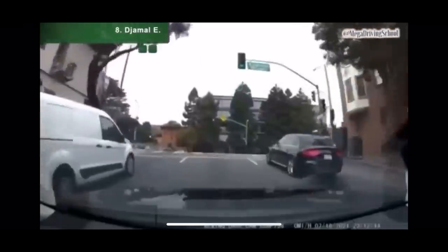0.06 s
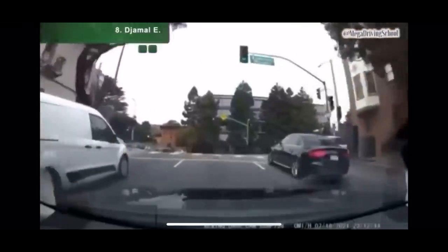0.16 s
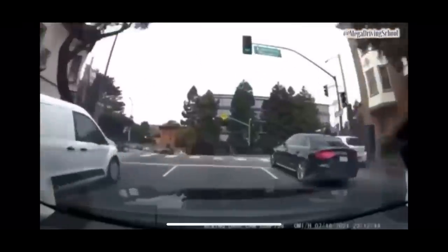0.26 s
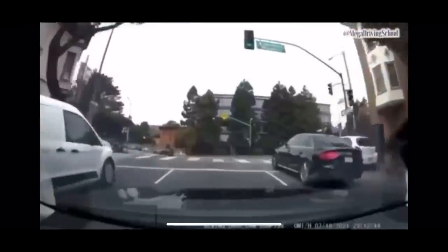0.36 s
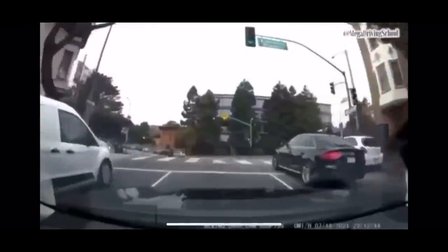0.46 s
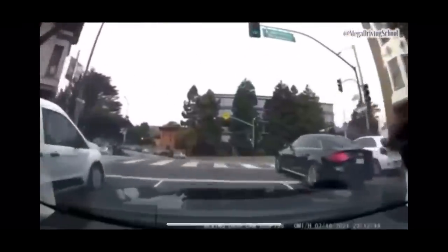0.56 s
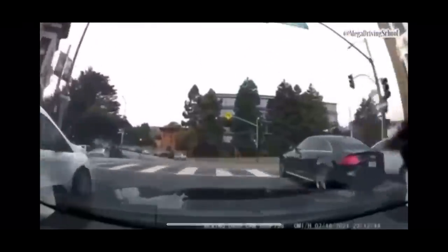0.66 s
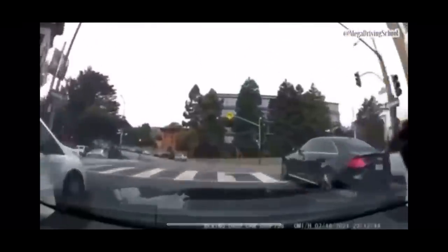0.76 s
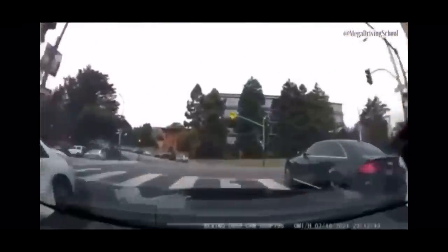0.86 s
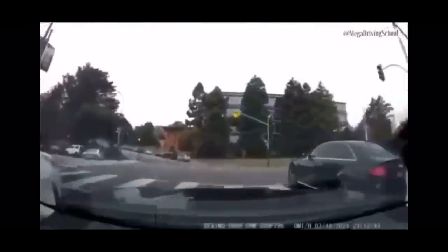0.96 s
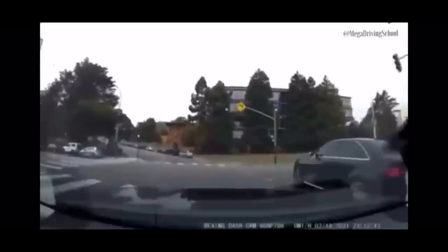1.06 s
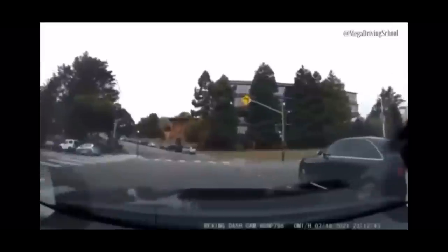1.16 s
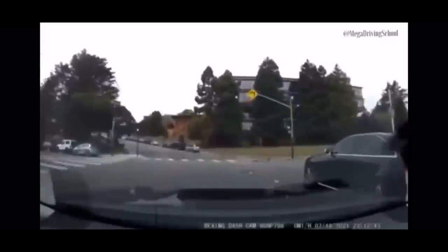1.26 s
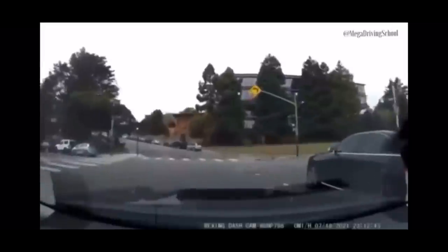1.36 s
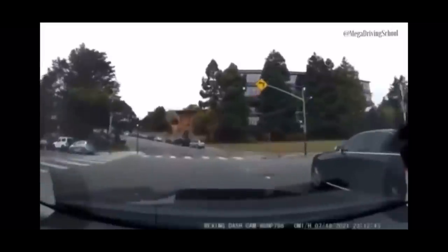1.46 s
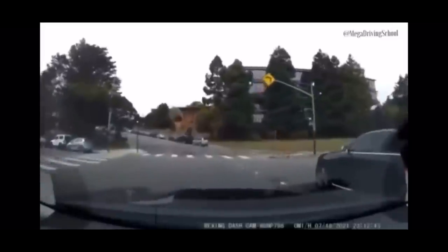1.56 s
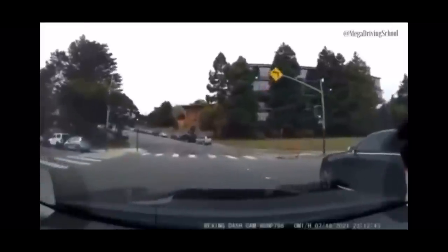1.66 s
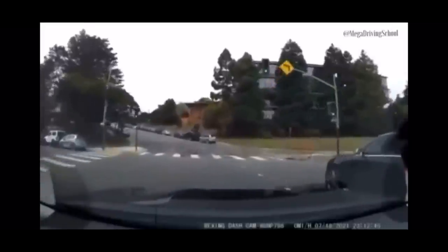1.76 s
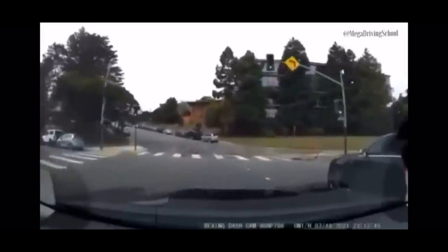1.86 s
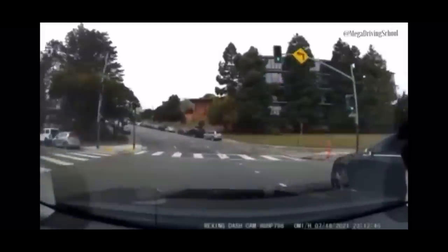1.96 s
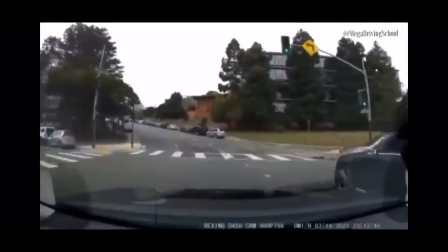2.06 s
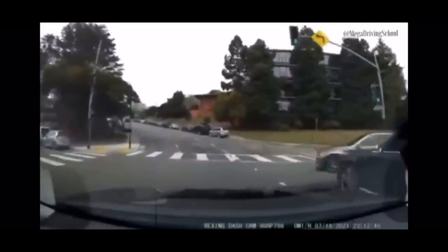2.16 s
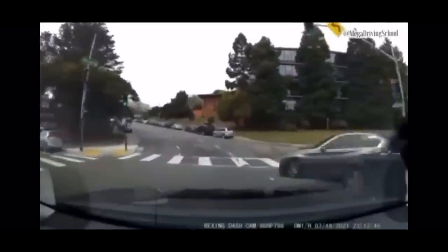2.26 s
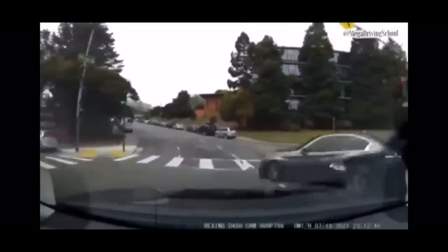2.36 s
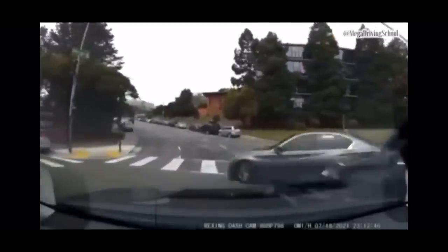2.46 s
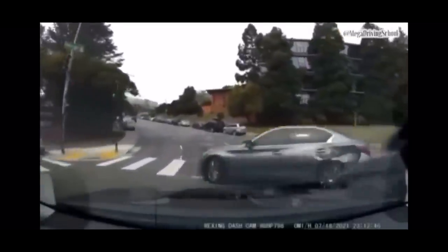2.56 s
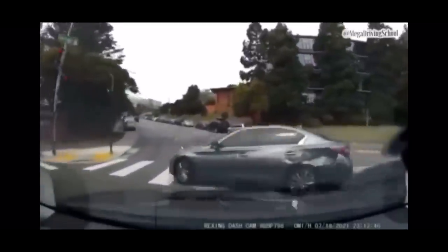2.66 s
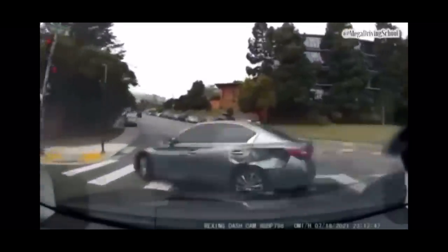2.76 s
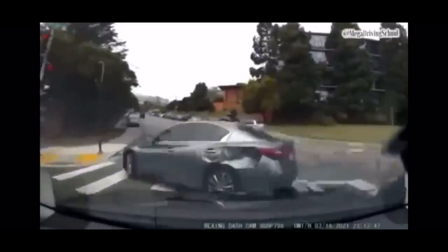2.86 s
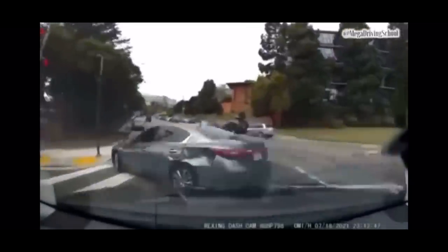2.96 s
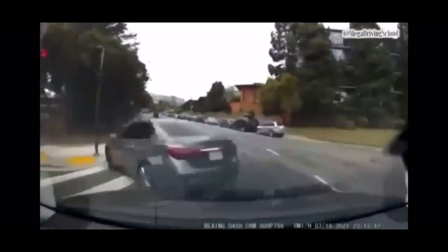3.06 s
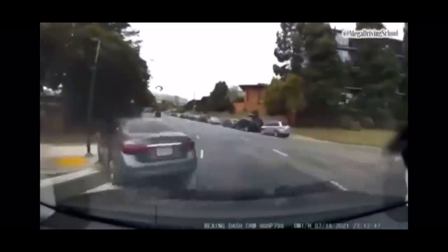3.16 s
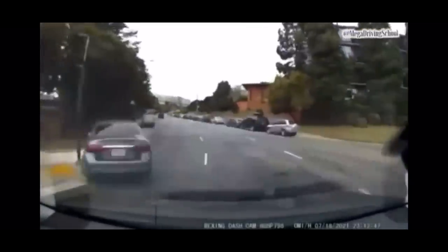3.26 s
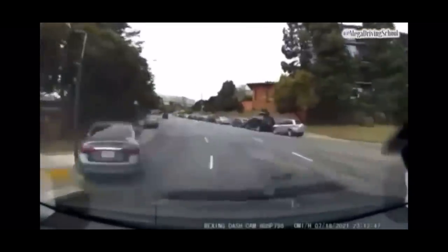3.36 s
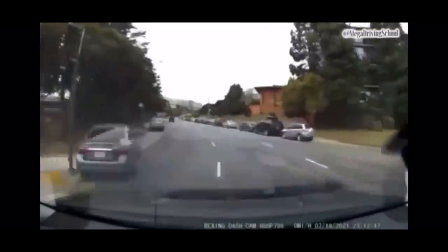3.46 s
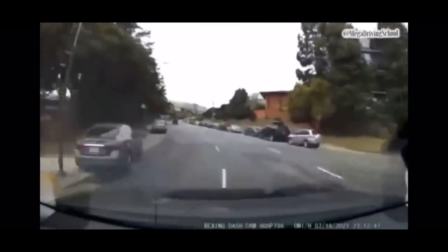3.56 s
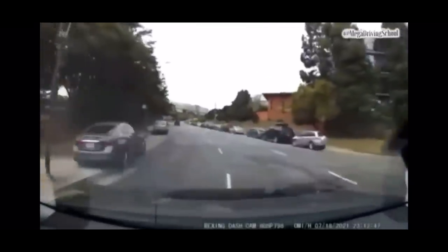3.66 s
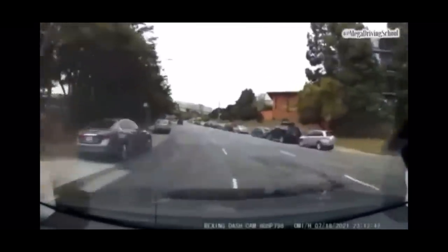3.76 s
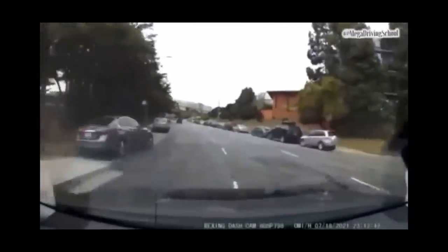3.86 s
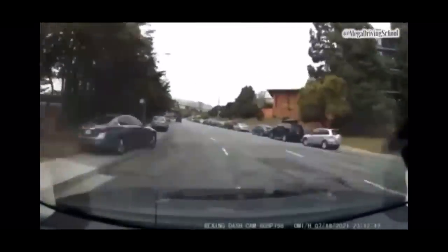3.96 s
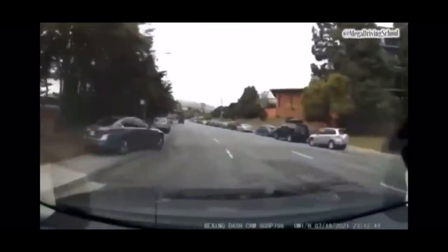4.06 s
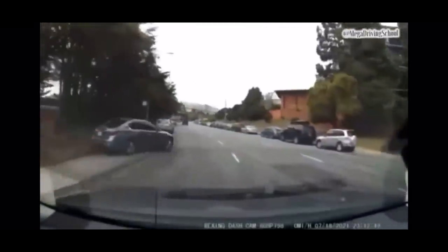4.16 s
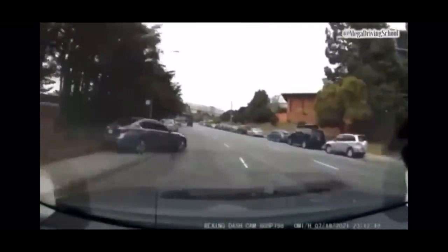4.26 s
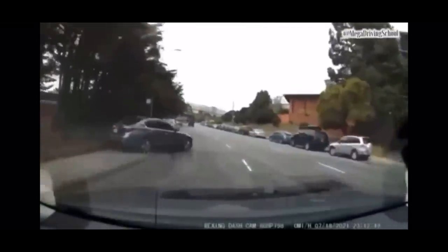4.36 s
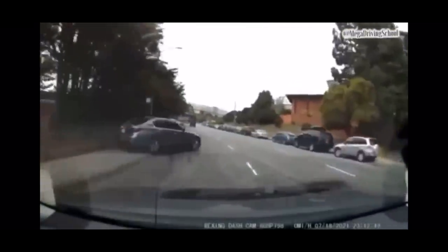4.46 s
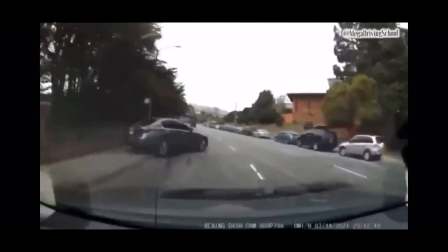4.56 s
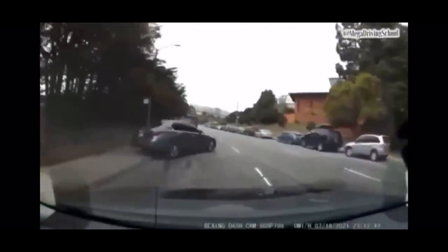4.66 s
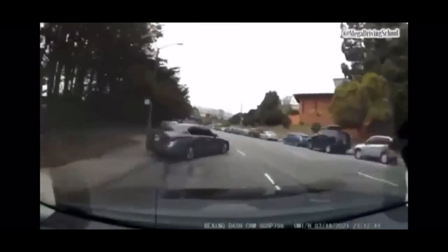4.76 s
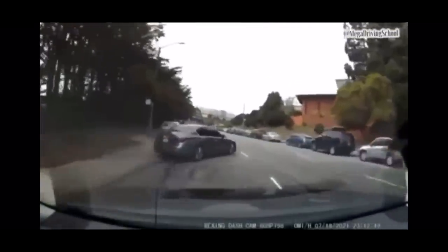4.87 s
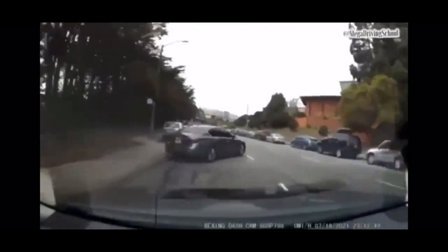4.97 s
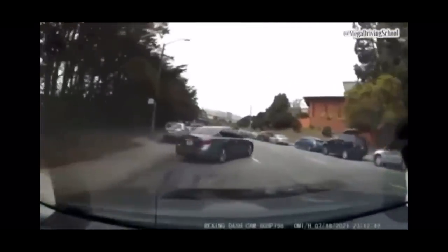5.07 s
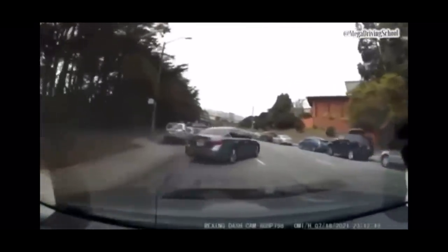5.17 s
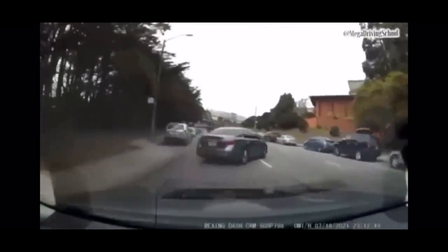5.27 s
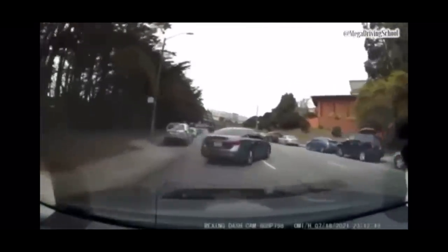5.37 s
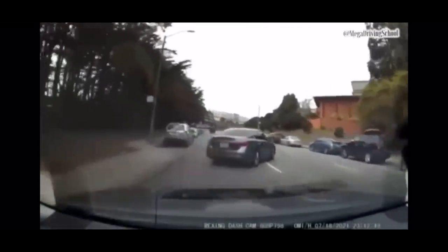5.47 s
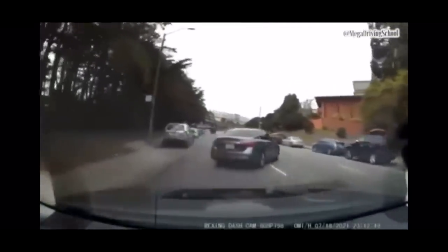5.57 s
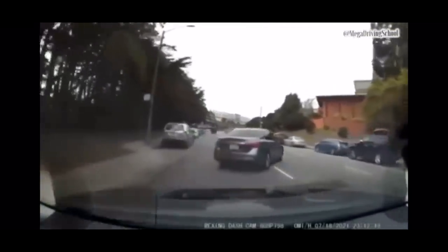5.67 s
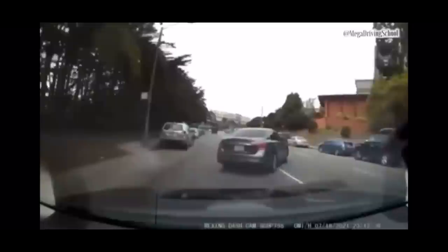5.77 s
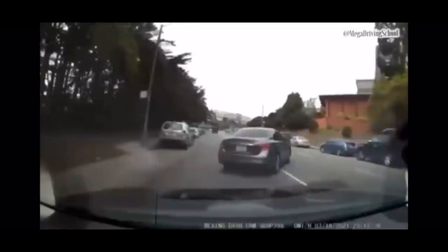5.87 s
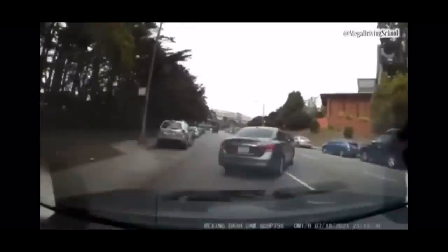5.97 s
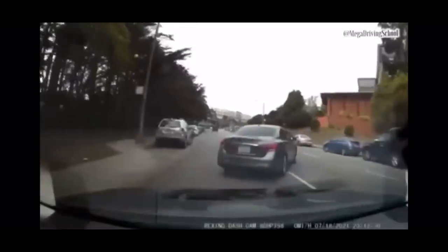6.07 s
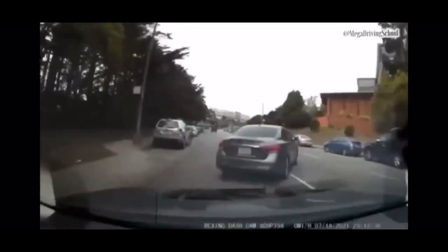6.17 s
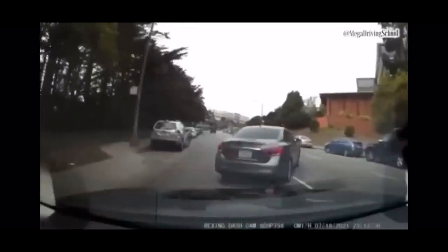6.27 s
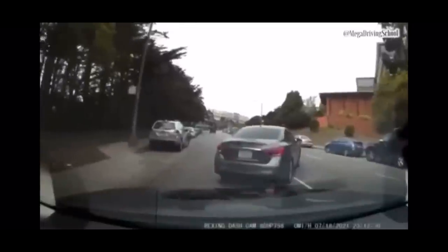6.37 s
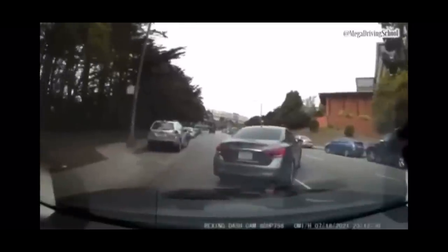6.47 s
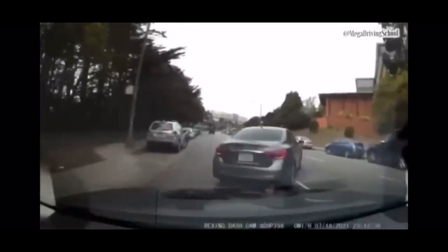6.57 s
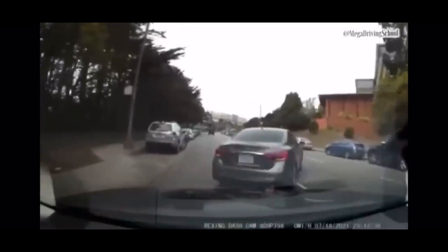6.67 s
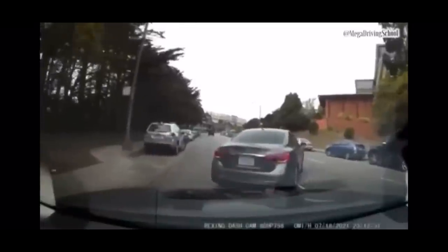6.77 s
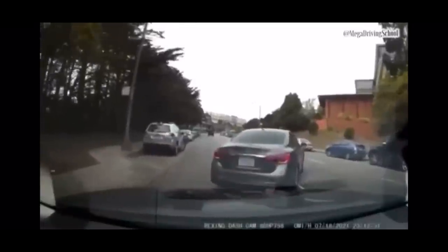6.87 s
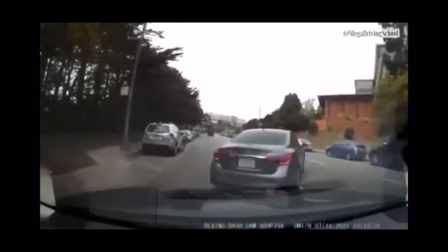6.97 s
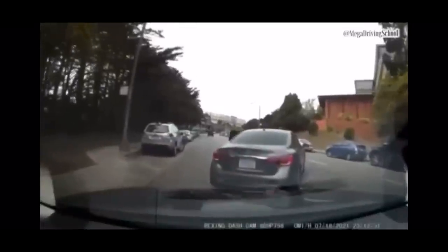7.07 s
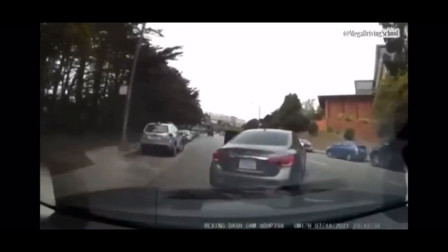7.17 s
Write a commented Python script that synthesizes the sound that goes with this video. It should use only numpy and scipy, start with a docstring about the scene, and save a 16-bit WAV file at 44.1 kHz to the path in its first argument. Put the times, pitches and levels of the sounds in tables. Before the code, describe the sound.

From inside a following car, soft low rumble, floor roar and muffled traffic wash open the scene. From about 1 second a faint hoarse tyre tone creeps in, and from 1.6 it grows into a wavering mid-pitched howl, joined around 2 to 2.6 by higher, rougher squeals with tearing edges. Quick chirps follow at 2.7 and 2.8, while heavy low bumps thump through the cabin until about 3.3. A second, patchier squeal runs from 3.2 to 3.8 with short bites, then a bright two-toned screech beats from 4 to 4.5 and echoes along the street. Small scrapes accompany the skids. Loose things tick and rattle at 4.6 to 5.25. After a quieter roll, braking brings a sharp hard knock at 5.95, low judder and a hollow clunk near 6.2, then a short dull brake groan at 6.3, fading almost to silence by 7.

```python
"""Skidding saloon, heard from a following car

A saloon skids through a junction on squealing tyres, slides on and squeals again: stick-slip tones,
chirps, squeaks and tearing noise, echoed by the street. The following car rumbles over the crossing
(shaped noise, ringing body modes) and brakes; loose things in its cabin tick as struck modes and
rattles, one knocks sharply as it slows, and the brakes groan as it stops."""
import sys
import numpy as np
from scipy import signal
from scipy.fft import rfft, irfft, next_fast_len
from scipy.io import wavfile
from scipy.ndimage import uniform_filter1d, minimum_filter1d

SR = 44100
rng = np.random.default_rng(int(sys.argv[2]) if len(sys.argv) > 2 else 0)


def generate_wav(signal):
    """Clip the signal to [-1, 1] and save it as 16-bit WAV at the path in sys.argv[1]."""
    frames = np.transpose(np.atleast_2d(signal))
    scaled = np.clip(frames, -1, 1) * 32767
    pcm = np.round(scaled).astype(np.int16)
    wavfile.write(sys.argv[1], SR, pcm)


N = 318611
TIME = np.arange(N) / SR


def from_db(db):
    """Decibels to amplitude gain."""
    return 10 ** (np.asarray(db) / 20)


def rms_one(x):
    """Scale to unit rms."""
    return x / np.sqrt(np.mean(np.abs(x) ** 2) + 1e-20)


def in_time(rows):
    """Interpolate each column of a curve at every sample."""
    time_s, *columns = np.transpose(rows)
    return [np.interp(TIME, time_s, column) for column in columns]


def low_pass(x, hz, order=2):
    """Butterworth low-pass."""
    return signal.sosfilt(signal.butter(order, min(hz, SR / 3), fs=SR, output="sos"), x)


def band(x, low_hz, high_hz, order=2):
    """Butterworth band-pass."""
    edges_hz = [low_hz, min(high_hz, SR / 2.3)]
    return signal.sosfilt(signal.butter(order, edges_hz, "band", fs=SR, output="sos"), x)


def drift(rate_hz, order=2, size=N):
    """Smooth random wander of unit rms, drawn at every 16th sample."""
    step, run_in = 16, 3000
    white = rng.standard_normal(N // step + run_in + 2)
    slow = rms_one(low_pass(white, rate_hz * step, order)[run_in:])
    return np.interp(np.arange(size) / step, np.arange(len(slow)), slow)


def noise(spectrum):
    """Gaussian noise of a given spectral density, unit rms, falling away beyond the end points."""
    hz, db = np.transpose(spectrum)
    size = next_fast_len(N, real=True)
    f = np.maximum(np.fft.rfftfreq(size, 1 / SR), 1)
    skirts = np.minimum(1, np.minimum(f / hz[0], hz[-1] / f)) ** 2
    colour = from_db(np.interp(np.log(f), np.log(hz), db))
    white = rfft(rng.standard_normal(size))
    return rms_one(irfft(white * skirts * colour, size)[:N])


def swell(start_s, end_s, rise_s, fall_s):
    """Gain that rises, holds from start to end and dies away; rise and fall are times per 20 dB."""
    before = np.maximum(start_s - TIME, 0) / rise_s
    after = np.maximum(TIME - end_s, 0) / fall_s
    return np.exp(-np.log(10) * (before + after).clip(0, 10))


def strike(hits, modes):
    """Each hit excites every damped resonance with a random strength of its own."""
    out = np.zeros(N)
    hit_s, level_db = np.transpose(hits)[:2]
    for hz, mode_db, t60_s in modes:
        clicks = np.full(N, 1e-18)
        chance_db = rng.normal(0, 1.5, len(hit_s))
        clicks[(hit_s * SR).astype(int)] = from_db(level_db + mode_db + chance_db)
        radius = np.exp(-np.log(1000) / (t60_s * SR))
        angle = 2 * np.pi * hz / SR
        out += signal.lfilter([0, np.sin(angle)], [1, -2 * radius * np.cos(angle), radius ** 2], clicks)
    return out


# Steady rolling, dying away as the car stops: t/s, body rumble/dB, road roar/dB, tyre hiss/dB
ROLLING_CURVE = [(0, -44, -47, -67), (.75, -47, -44, -60), (1.4, -38, -42.5, -57.5),
                 (2.1, -46.5, -44, -53.5), (4.35, -46, -49.5, -48), (5.8, -46, -55, -61.5),
                 (6.65, -56.5, -56, -60), (7.22, -61, -57, -67)]
# Shaking from rough ground or hard braking: start t/s, end t/s, rumble/dB, roar/dB
SHAKING_SPELLS = [(2.383, 4.016, -37.5, -37), (2.792, 2.948, -21, -25), (2.996, 3.087, -25, -59),
                  (3.266, 3.373, -27.5, -50), (5.926, 6, -27.5, -33.5), (6.07, 6.3, -40, -45.5),
                  (6.375, 6.45, -35.5, -48)]
# Single bumps under the wheels: t/s, rumble/dB, roar/dB
WHEEL_BUMPS = [(1.17, -33.5, -48), (2.357, -45, -23), (2.531, -46, -28.5), (2.679, -26.5, -27),
               (2.92, -24, -23.5), (3.255, -21.5, -25.5), (3.539, -30.5, -35.5), (3.99, -35.5, -32.5),
               (4.189, -41, -40.5), (4.503, -34, -31), (4.551, -30.5, -36), (4.65, -38, -44.5),
               (5.932, -39, -36.5), (6.11, -37, -56), (6.425, -31.5, -46.5)]
SHAKE_RISE_S, SHAKE_FALL_S = 0.11, 0.14  # per 20 dB
BUMP_RISE_S, BUMP_FALL_S = 0.037, 0.12  # per 20 dB


def shaking():
    """Rumble and roar gains: rolling, shaking spells and bumps add in power."""
    power = from_db(in_time(ROLLING_CURVE)[:2]) ** 2
    for start_s, end_s, *db in SHAKING_SPELLS:
        power += np.outer(from_db(db), swell(start_s, end_s, SHAKE_RISE_S, SHAKE_FALL_S)) ** 2
    for time_s, *db in WHEEL_BUMPS:
        power += np.outer(from_db(db), swell(time_s, time_s, BUMP_RISE_S, BUMP_FALL_S)) ** 2
    return np.sqrt(power)


# Relative noise densities of body rumble, heave on the springs and floor roar: f/Hz, density/dB
RUMBLE_SPECTRUM = [(38, -10), (48, 5), (62, -5), (85, -6.5), (125, -5), (165, -18.5)]
HEAVE_SPECTRUM = [(14, -5.5), (20, 1), (27, -2), (36, -15), (44, -22)]
ROAR_SPECTRUM = [(110, -18), (140, -9.5), (175, 1.5), (240, -1), (330, -7), (450, -6.5), (650, -7.5),
                 (850, -16), (1200, -14), (1600, -17.5), (2000, -22.5)]
HEAVE_REL_RUMBLE_DB, HEAVE_SMOOTHING_S = 2.5, 0.24


def ride():
    """The road shakes the car body, rocks it on its springs and roars through the floor."""
    rumble_gain, roar_gain = shaking()
    rumble = rumble_gain * noise(RUMBLE_SPECTRUM)
    heave_gain = uniform_filter1d(rumble_gain, size=int(HEAVE_SMOOTHING_S * SR))
    heave = from_db(HEAVE_REL_RUMBLE_DB) * heave_gain * noise(HEAVE_SPECTRUM)
    roar = roar_gain * from_db(1.0 * drift(35)) * noise(ROAR_SPECTRUM)
    return rumble + heave + roar


# Drag of sliding rubber on asphalt: t/s, level/dB
DRAG_CURVE = [(0, -61), (.85, -51), (1.55, -49), (2.3, -39), (2.72, -43), (2.98, -47), (3.14, -79),
              (3.28, -47), (3.6, -46.5), (3.8, -40), (4.15, -48), (4.35, -53), (4.75, -54.5), (5.3, -66),
              (6, -64), (6.7, -83)]
# Patches of loose grit under the tyres: start t/s, end t/s, level/dB
LOOSE_GRIT = [(2.43, 2.68, -43), (3.697, 3.948, -43), (4.316, 4.857, -63.5), (5.848, 6.095, -60.5)]
# Relative noise densities of the three voices: f/Hz, density/dB
SCRUB_SPECTRUM = [(600, -19), (820, 5), (970, 3.5), (1100, -3), (1250, -2), (1600, -4), (1850, -17.5),
                  (2400, -28.5)]
RASP_SPECTRUM = [(1400, -28), (1900, 2), (2400, 1.5), (2900, 3.5), (3600, -5.5), (4600, -16), (6500, -38.5)]
GRIT_SPECTRUM = [(3000, -2), (4200, 2.5), (5600, 1.5), (6700, -4.5), (8000, -6), (9000, -14), (11000, -16)]
SCRUB_REL_DRAG_DB, RASP_REL_DRAG_DB, GRIT_REL_DRAG_DB = 10, -1.5, -20
HISS_IN_GRIT_DB, PATCH_IN_RASP_DB = -5, 1
PATCH_RISE_S, PATCH_FALL_S = 0.19, 0.18  # per 20 dB


def scrubbing():
    """Rubber drags and rolls over coarse asphalt; rasp and grit come in tiny uneven bursts."""
    drag = from_db(in_time(DRAG_CURVE)[0])
    hiss = from_db(in_time(ROLLING_CURVE)[2])
    patches = sum(from_db(db) * swell(start_s, end_s, PATCH_RISE_S, PATCH_FALL_S)
                  for start_s, end_s, db in LOOSE_GRIT)
    grains = from_db(1.7 * drift(160) + 1.0 * drift(11))
    scrub = from_db(SCRUB_REL_DRAG_DB) * drag * noise(SCRUB_SPECTRUM)
    # norm: contributions add in power
    rasp_parts = [from_db(RASP_REL_DRAG_DB) * drag, hiss, from_db(PATCH_IN_RASP_DB) * patches]
    rasp = np.linalg.norm(rasp_parts, axis=0) * noise(RASP_SPECTRUM)
    grit_parts = [from_db(GRIT_REL_DRAG_DB) * drag, from_db(HISS_IN_GRIT_DB) * hiss, patches]
    grit = np.linalg.norm(grit_parts, axis=0) * noise(GRIT_SPECTRUM)
    return scrub + grains * (rasp + grit)


# Wash of other traffic: t/s, level/dB
TRAFFIC_CURVE = [(0, -55.5), (5.3, -54), (6.2, -60), (6.7, -58), (7.22, -62.5)]
# Its relative noise density: f/Hz, density/dB
WASH_SPECTRUM = [(350, -1), (600, -5.5), (900, 1), (1300, -5), (1600, 0), (2100, -22)]


def traffic():
    """Other cars roll by in uneven surges, dulled by the closed windows."""
    surge_db = 1.8 * drift(5.2)
    return from_db(in_time(TRAFFIC_CURVE)[0] + surge_db) * noise(WASH_SPECTRUM)


SLIP_START_DB = -50  # envelope below which the tyre is silent


def tyre(hz, envelope, rough, spread_hz, waver_hz, flutter_db, second_db, third_db):
    """Tread blocks stick and slip: in step one wavering tone, out of step a hoarse band around it."""
    sliding = envelope > from_db(SLIP_START_DB)
    size, rough, out = sliding.sum(), np.clip(rough, 0, 1), np.zeros(N)
    wavering_hz = hz[sliding] + waver_hz * drift(35.25, size=size)
    turn = np.exp(2j * np.pi * np.cumsum(wavering_hz) / SR)
    scatter_re = drift(spread_hz, order=4, size=size)
    scatter_im = drift(spread_hz, order=4, size=size)
    scatter = (scatter_re + 1j * scatter_im) / np.sqrt(2)
    slip = turn * (np.sqrt(1 - rough ** 2) + rough * scatter)
    # friction holds the mean swing steady while the blocks beat against each other
    slip /= np.sqrt(uniform_filter1d(np.abs(slip) ** 2, size=1300) + 1e-9)
    # sudden release of each slip adds ragged overtones
    ragged = turn * np.exp(1j * 0.85 * drift(94, size=size))
    wave = np.real(slip * (1 + from_db(second_db) * ragged + from_db(third_db) * ragged ** 2))
    out[sliding] = np.sqrt(2) * wave * from_db(flutter_db * drift(36, size=size))
    return envelope * out


# Howls: start t/s, end t/s, rise/(s per 20 dB), fall/(s per 20 dB), start f/Hz, glide/(Hz/s), level/dB,
# roughness (clipped to 1), spread/Hz, second harmonic/dB
HOARSE_SKIDS = [(.95, 1.187, 1.1, 0.48, 982, 24.5, -48, 0.5, 110, -11),
                (2.06, 2.194, .35, 0.17, 900.7, 66, -29.5, 0.74, 73, -25.5),
                (1.76, 2.265, 0.19, 0.13, 1563, -32, -34.5, 0.67, 83, -19.5),
                (1.94, 2.067, 0.08, 0.13, 1340, 597, -29.5, 0.69, 121, -19.5),
                (2.121, 2.573, 0.21, 0.28, 1464, -59, -35, 1.1, 129.4, -18.5),
                (2.328, 2.493, 0.038, 0.12, 1381, -190, -25, 0.33, 80, -19),
                (2.505, 2.559, .03, 0.13, 1421, 900.5, -31.5, .45, 80, -19.5),
                (2.876, 3.017, 0.1, 0.05, 1017, 6, -40.5, 0.87, 147, -20.5),
                (3.45, 3.758, 0.28, 0.12, 889, 169, -37, 0.84, 75, -9.5),
                (3.751, 4.097, 0.12, 0.28, 860.4, 110.5, -32.5, 1.04, 60.5, -10),
                (3.27, 3.697, 0.069, 0.16, 1537, 1.5, -48, 0.65, 112, -10.5),
                (3.781, 3.984, 0.13, 0.13, 1578, 93, -38, 0.5, 90, -24),
                (3.89, 3.962, 0.049, 0.057, 1194, -600, -31.5, 0.6, 90, -16)]


def skids():
    """Hoarse sliding tyres: each swells, glides slowly while it holds, and fades."""
    out = np.zeros(N)
    for start_s, end_s, rise_s, fall_s, hz, glide, db, rough, spread_hz, overtone_db in HOARSE_SKIDS:
        pitch_hz = hz + glide * (np.clip(TIME, start_s, end_s) - start_s)
        envelope = swell(start_s, end_s, rise_s, fall_s)
        out += from_db(db) * tyre(pitch_hz, envelope, rough, spread_hz, waver_hz=21.78, flutter_db=1.4,
                                  second_db=overtone_db, third_db=overtone_db - 16.0)
    return out


# Relative noise density of tearing rubber: f/Hz, density/dB
TEARING_SPECTRUM = [(1700, -11), (2200, 8.5), (2800, -1.5), (3400, -0.5), (4500, -19.5), (6000, -33.5)]
TEARING_REL_TONES_DB = -26


def tearing(tones):
    """Rubber tears at the height of each slip: noise follows the rectified tones."""
    gain = from_db(TEARING_REL_TONES_DB + 2.0 * drift(70))
    return gain * np.abs(tones) * noise(TEARING_SPECTRUM)


# Most loaded tyre in each of the two slides: t/s, f/Hz, level/dB before trim
FIRST_SLIDE = [(1.35, 835, -38), (1.58, 835, -41), (1.62, 831, -32.5), (1.69, 836, -25), (1.72, 829.4, -29),
               (1.79, 836, -27), (1.88, 840, -30), (1.929, 815, -28.5), (1.99, 850, -24),
               (2.03, 850, -27.5), (2.12, 830, -20.5), (2.157, 840, -28), (2.2, 862, -25.5),
               (2.27, 812, -28.5), (2.381, 865, -26), (2.44, 850, -31), (2.48, 820, -30),
               (2.536, 860, -25.5), (2.6, 890, -33.5), (2.638, 855, -27), (2.7, 819, -37.5)]
SECOND_SLIDE = [(3.185, 825, -46), (3.22, 865.4, -29), (3.25, 882, -42.5), (3.31, 825, -35.5),
                (3.37, 820, -44), (3.46, 845, -27), (3.49, 810.7, -31), (3.55, 835, -35),
                (3.6, 829.3, -33.5), (3.66, 868, -27), (3.69, 835, -35), (3.73, 860, -25), (3.78, 892, -38)]


def howl(curve, edge_s=.15):
    """The most loaded tyre wobbles in pitch and strength as its grip comes and goes."""
    hz, db = in_time(curve)
    sliding = swell(curve[0][0], curve[-1][0], edge_s, edge_s)
    trim_db = -.5
    return from_db(db + trim_db) * tyre(hz, sliding, 0.55, spread_hz=56, waver_hz=14, flutter_db=1.6,
                                        second_db=-21.5, third_db=-26)


# Joint level of the tread-block squeaks: t/s, level/dB
SQUEAK_CURVE = [(1.65, -52), (1.85, -49.5), (2.1, -44), (2.35, -44.5), (2.72, -44), (2.95, -70), (3.6, -62),
                (3.77, -42.5), (3.95, -45.5), (4.15, -40), (4.32, -49), (4.47, -55), (4.56, -67)]
SQUEAKS_PER_S, SQUEAK_WIDTH_S, SQUEAK_MAX_GLIDE_HZ_PER_S = 130, 0.0075, 2400
SQUEAK_LOW_HZ, SQUEAK_HIGH_HZ = 2110, 4303
SQUEAK_STRONGEST_HZ, SQUEAK_FALL_DB_PER_OCTAVE = 2720, 25


def squeaks():
    """Tread blocks let go singly: brief gliding whistles overlap into a torn edge on the squeal."""
    out, t = np.zeros(N), np.arange(-SR // 20, SR // 20) / SR
    start_s, end_s = SQUEAK_CURVE[0][0], SQUEAK_CURVE[-1][0]
    chances = rng.random((int((end_s - start_s) * SQUEAKS_PER_S), 4))
    for k, (late, pitch, bend, weakness) in enumerate(chances):
        centre_hz = SQUEAK_LOW_HZ * (SQUEAK_HIGH_HZ / SQUEAK_LOW_HZ) ** pitch
        hz = centre_hz + SQUEAK_MAX_GLIDE_HZ_PER_S * (2 * bend - 1) * t
        duller_db = SQUEAK_FALL_DB_PER_OCTAVE * np.abs(np.log2(hz / SQUEAK_STRONGEST_HZ))
        gain = from_db(-9 * weakness - duller_db) * np.exp(-(t / SQUEAK_WIDTH_S) ** 2 / 2)
        at = int((start_s + (k + late) / SQUEAKS_PER_S + t[0]) * SR)
        out[at:at + len(t)] += gain * np.sin(2 * np.pi * np.cumsum(hz) / SR)
    active_rms = np.std(out[int(start_s * SR):int(end_s * SR)])
    return from_db(in_time(SQUEAK_CURVE)[0]) * out / active_rms


# Suspension jolts: t/s, level/dB
SUSPENSION_JOLTS = [(2.34, -41), (2.66, -25.5), (2.897, -19), (3.0, -23), (3.285, -32), (5.955, -31),
                    (6.01, -30)]
# Car body modes: f/Hz, level/dB, t60/s
BODY_MODES = [(20.1, -17.5, 0.38), (35.2, 7, 0.19), (70, 1.5, 0.23), (121, 2, 0.04), (168, 4, 0.11)]


def jolts():
    """Jolts through the suspension ring the body's low modes."""
    return strike(SUSPENSION_JOLTS, BODY_MODES)


# Loose things in the cabin: t/s, click/dB, rattle/dB, f/Hz, rattle t60/s
CABIN_KNOCKS = [(2.36, -50, -31, 3516, .079), (2.679, -48, -35, 4450, .028),
                (2.976, -45, -36.5, 5100, 0.088), (3.843, -41, -25, 2420, 0.045),
                (3.984, -50, -36, 4930, 0.17), (4.5891, -32.5, -23.5, 2730, .045),
                (4.592, -50, -37.5, 4340, 0.12), (4.723, -38.5, -34, 4600, .03),
                (5.015, -42.5, -31, 3220, 0.045), (5.086, -52, -31.5, 3070, 0.043),
                (5.0903, -44.5, -49, 4310, .05), (5.155, -50, -43, 1760, .07),
                (5.2493, -44, -35.5, 1870, 0.02), (5.954, -42, -29, 3320, .05),
                (5.9597, -26.5, -22, 1980, 0.079), (5.9665, -42, -30, 1200, 0.089),
                (5.9714, -35, -32, 3270, .13), (5.975, -48, -33.5, 4950, .1)]
# Trim modes: f/Hz, level/dB, t60/s
TRIM_MODES = [(875, 0.5, 0.04), (1150, -6, .03), (1440, 2, .035), (1900, -4, 0.012), (2700, 9.5, 0.0098),
              (4050, 1, 0.0058), (4760, -11.5, .008), (7460, -19.5, 0.012)]
KNOCK_ATTACK_S = .0015
OWN_RING_REL_CLICK_DB, OWN_RING_T60_S = 9.5, 0.032


def knocks():
    """Each contact is a hard click ringing the trim and the thing itself, then a dying rattle."""
    out = strike(CABIN_KNOCKS, TRIM_MODES)
    t = TIME[:SR // 4]
    attack = np.minimum(t / KNOCK_ATTACK_S, 1)
    for time_s, click_db, rattle_db, hz, t60_s in CABIN_KNOCKS:
        chatter = rng.standard_normal(len(t)) * from_db(1.4 * drift(300, size=len(t)))
        rattle = rms_one(band(chatter, hz / 1.22, hz * 1.05, order=1))
        rattle = from_db(rattle_db) * rattle * np.exp(-np.log(1000) * t / t60_s)
        ring = np.sin(2 * np.pi * hz * t) * np.exp(-np.log(1000) * t / OWN_RING_T60_S)
        ring = from_db(click_db + OWN_RING_REL_CLICK_DB) * ring
        start = int(time_s * SR)
        out[start:start + len(t)] += (rattle + ring) * attack
    return band(out, 460, 9000)


# Brief scrapes as the cars swerve and brake: t/s, level/dB, Gaussian width/s
SCRAPES = [(2.55, -44, 0.082), (2.813, -34.5, 0.027), (2.988, -41, 0.028), (3.287, -48, 0.05),
           (3.506, -41, 0.0054), (3.543, -37, 0.019), (3.736, -35.5, 0.022), (3.928, -35, 0.0077),
           (4.17, -45.5, 0.094), (4.683, -47.5, 0.014), (4.746, -39.5, 0.021), (4.773, -46.5, 0.011),
           (5.477, -51, 0.037), (5.733, -52.5, 0.063)]


def scuffs():
    """Each scrape swells and fades with a grainy rustle of band-passed noise."""
    speed = sum(from_db(db) * np.exp(-((TIME - time_s) / width_s) ** 2 / 2)
                for time_s, db, width_s in SCRAPES)
    grains = from_db(2.0 * drift(120))
    return speed * rms_one(band(rng.standard_normal(N), 2030, 4400) * grains)


# Short bites of the rubber: t/s, f/Hz, level/dB, Gaussian width/s, glide/(Hz/s), second harmonic/dB
TREAD_BITES = [(2.692, 1390, -36.5, .013, -600, 3), (2.708, 1293, -21, 0.014, 8, -21),
               (2.734, 1243, -22, 0.0085, -900, -8.5), (2.807, 1245, -17, 0.0058, -1.5, -16.5),
               (3.275, 1530, -35.5, 0.02, 307, -21), (3.333, 814, -21, 0.0078, -600, -19.5),
               (3.512, 1474, -27, 0.0094, 1503, -13.5), (3.64, 850, -19.5, 0.015, 903, -19),
               (3.8545, 1214, -12.5, 0.0043, -2500, -17), (4.222, 1258, -18.5, 0.022, 1, -20)]


def chirps():
    """The tread bites briefly: Gaussian tone bursts with overtones, bending in pitch."""
    out, wander_hz = np.zeros(N), 20 * drift(120.0)
    for time_s, hz, db, width_s, glide, overtone_db in TREAD_BITES:
        near = np.abs(TIME - time_s) < .15
        t = TIME[near] - time_s
        phase = 2 * np.pi * np.cumsum(hz + glide * t + wander_hz[near]) / SR
        overtones = np.sin(2 * phase) + from_db(-18) * np.sin(3 * phase)
        wave = np.sin(phase) + from_db(overtone_db) * overtones
        out[near] += from_db(db) * np.exp(-(t / width_s) ** 2 / 2) * wave
    return out


# Two tones of the final screech: t/s, f/Hz, level/dB before trim
UPPER_TONE = [(3.96, 1156, -32), (3.986, 1262, -23.5), (4.11, 1168, -24), (4.162, 1222, -27),
              (4.188, 1161, -23), (4.21, 1229, -29), (4.33, 1267, -20.5), (4.348, 1184, -27),
              (4.444, 1243, -25), (4.476, 1310, -28.5), (4.49, 1270, -38.5)]
LOWER_TONE = [(4.0, 1010, -41), (4.035, 1055, -28), (4.091, 1000, -28.5), (4.13, 987, -28),
              (4.174, 1000, -16), (4.205, 985, -35), (4.242, 985, -21.5), (4.268, 1000, -33.5),
              (4.341, 1030, -35), (4.451, 1045, -36), (4.495, 1020, -32.5)]


def screech(edge_s=0.032):
    """Two clearer tones of the tread beat together as the car swings back."""
    upper_hz, upper_db = in_time(UPPER_TONE)
    lower_hz, lower_db = in_time(LOWER_TONE)
    upper_on = swell(UPPER_TONE[0][0], UPPER_TONE[-1][0], edge_s, edge_s)
    lower_on = swell(LOWER_TONE[0][0], LOWER_TONE[-1][0], edge_s, edge_s)
    upper_trim_db, lower_trim_db = -1.5, -0.5
    upper = from_db(upper_db + upper_trim_db) * tyre(
        upper_hz, upper_on, 0.3, spread_hz=110, waver_hz=10, flutter_db=2.2, second_db=-25, third_db=-30)
    lower = from_db(lower_db + lower_trim_db) * tyre(
        lower_hz, lower_on, 0.3, spread_hz=37, waver_hz=8, flutter_db=1.8, second_db=-13, third_db=-24)
    both = upper + lower
    # friction couples the tones, adding a strand at the sum of their pitches
    swing = np.sqrt(np.abs(uniform_filter1d(both ** 2, size=1300)) + 1e-9)
    sum_tone = band(upper * lower, 1700, 2800) / swing
    return both + from_db(-12 + 2 * drift(60)) * sum_tone


JUDDER_FROM_S, JUDDER_TO_S, JUDDER_HZ, JUDDER_PEAK_DB = 6.08, 6.31, 19.8, -25.5


def judder():
    """The body rocks quickly to and fro under hard braking: a wavering low sine."""
    envelope = swell(JUDDER_FROM_S, JUDDER_TO_S, rise_s=0.18, fall_s=0.31)
    phase = 2 * np.pi * np.cumsum(JUDDER_HZ + 0.92 * drift(6.7)) / SR
    return from_db(JUDDER_PEAK_DB) * envelope * np.sin(phase)


# Hollow plastic clunk: t/s, level/dB
CLUNK_HITS = [(6.1732, -43), (6.1757, -28), (6.1825, -33.5)]
# Its modes: f/Hz, level/dB, t60/s
HOLLOW_MODES = [(513, -4, 0.069), (810, -12, .019), (1090, 4, 0.045), (1290, -13, 0.027),
                (3140, -10, 0.025), (4750, -15, 0.02), (5400, -16, .014), (7700, -28, .012)]


def clunks():
    """Close hits ring the damped modes of hollow plastic."""
    return strike(CLUNK_HITS, HOLLOW_MODES)


# Brake groan as the car comes to rest: t/s, level/dB
GROAN_CURVE = [(6.323, -58), (6.332, -37), (6.357, -52), (6.38, -42), (6.405, -53), (6.45, -55.5),
               (6.58, -61)]


def groan():
    """The brake pads drag with a short dull rasp of band-passed noise."""
    return from_db(in_time(GROAN_CURVE)[0]) * rms_one(band(rng.standard_normal(N), 520, 850))


def squeals():
    """All tones of the sliding tyres, the tearing that follows their beating, and the squeaks."""
    tones = skids() + howl(FIRST_SLIDE) + howl(SECOND_SLIDE) + chirps() + screech()
    return tones + tearing(tones) + squeaks()


def street(x, t60_s=2.3, wet_db=-14, shimmer_hz=18):
    """Houses and trees scatter the squeal back later, along paths that shift as the cars move."""
    t, wet = TIME[:2 * SR], 0
    for _ in range(3):
        decay = np.exp(-np.log(1000) * t / t60_s)
        tail = rng.standard_normal(len(t)) * decay * np.minimum(t / 0.065, 1)
        echo = signal.fftconvolve(x, tail / np.linalg.norm(tail))[:N]
        wet = wet + drift(shimmer_hz) * echo / np.sqrt(3)
    return x + from_db(wet_db) * wet


def cabin(x, glass_db=-12, count=14):
    """Windscreen, windows and roof send back close reflections that ripple the spectrum."""
    lags = (rng.uniform(.001, .014, count) * SR).astype(int)
    signs = rng.choice([-1, 1], count)
    echoes = sum(sign * np.pad(x, (lag, 0))[:N] for lag, sign in zip(lags, signs))
    share = from_db(glass_db)
    return (x + share * echoes / np.sqrt(count)) / np.sqrt(1 + share ** 2)


def scene():
    """Tyres and traffic outside, the car's own noises inside."""
    outside = street(squeals()) + cabin(scrubbing() + traffic())
    inside = ride() + jolts() + knocks() + scuffs() + judder() + clunks() + groan()
    return (outside + inside)[None]


# Two notches in the overall tone: f/Hz, width/Hz, depth (0-1)
NOTCHES = [(1973, 750, 0.55), (6780, 1500, 0.54)]
CUTOFF_HZ, LIMIT_CEILING = 8950, .28


def record(dry):
    """Two notches thin out bands near 2 and 6.8 kHz; a limiter holds the peaks, a filter cuts the top."""
    for hz, width_hz, depth in NOTCHES:
        peak = signal.lfilter(*signal.iirpeak(hz, hz / width_hz, fs=SR), dry)
        dry = dry - min(depth, 1) * peak
    room_left = LIMIT_CEILING / np.maximum(np.abs(dry), LIMIT_CEILING)
    limited = dry * uniform_filter1d(minimum_filter1d(room_left, size=500), size=400)
    return signal.sosfilt(signal.ellip(10, .3, 70, CUTOFF_HZ, fs=SR, output="sos"), limited)


dry = scene()
out = record(dry)
generate_wav(out)
```